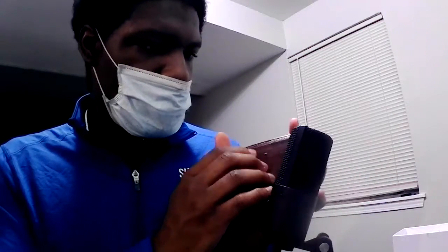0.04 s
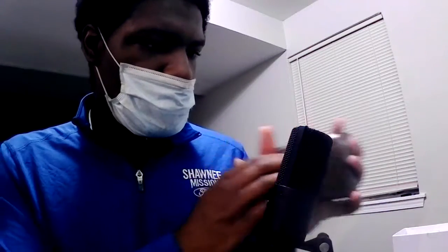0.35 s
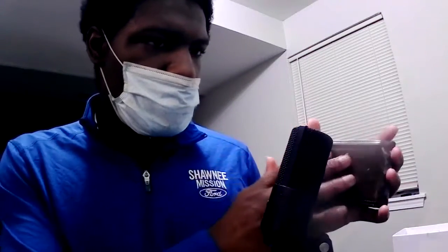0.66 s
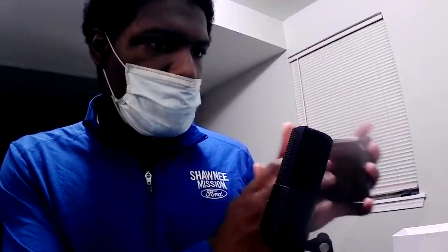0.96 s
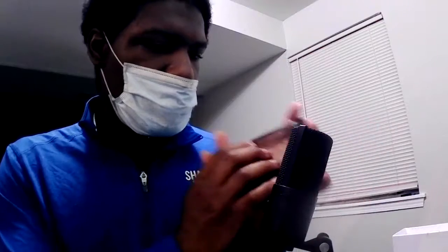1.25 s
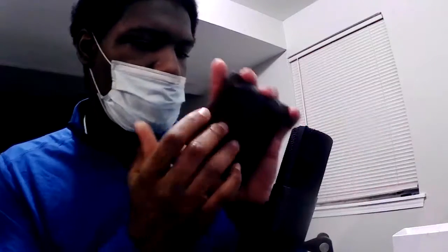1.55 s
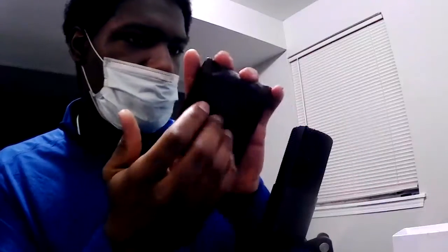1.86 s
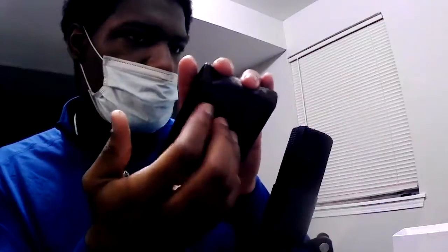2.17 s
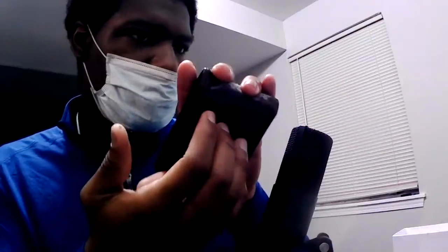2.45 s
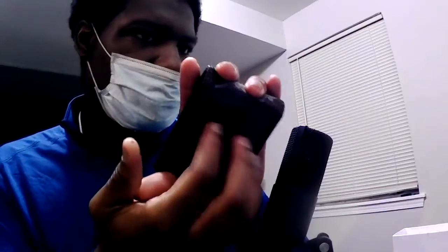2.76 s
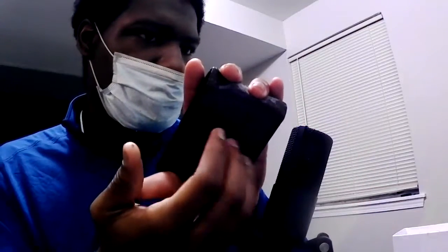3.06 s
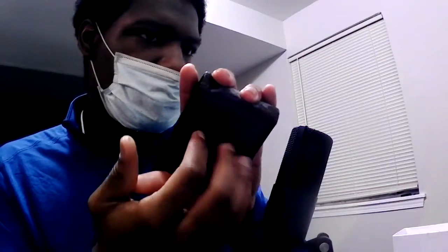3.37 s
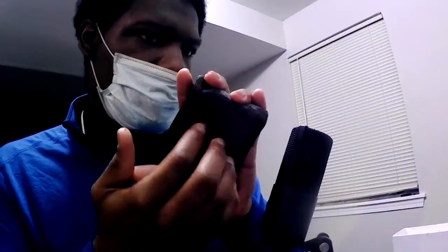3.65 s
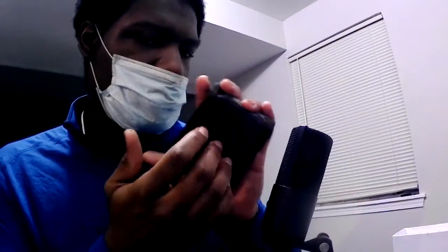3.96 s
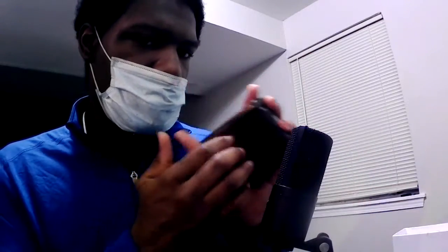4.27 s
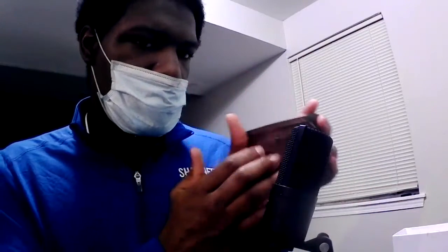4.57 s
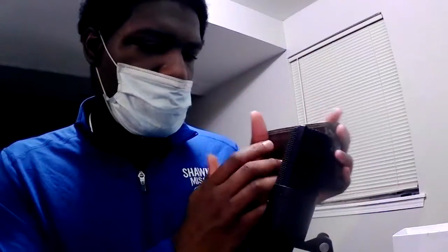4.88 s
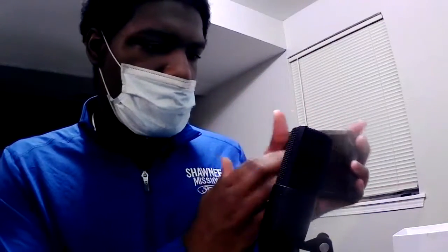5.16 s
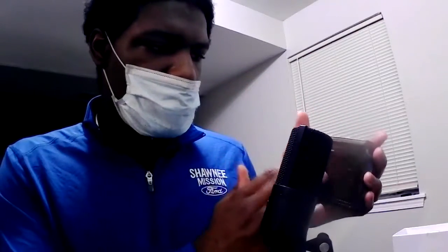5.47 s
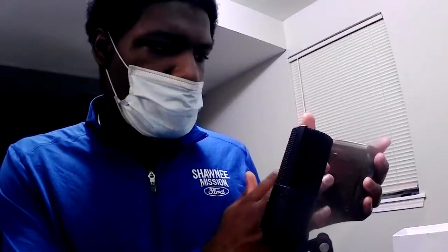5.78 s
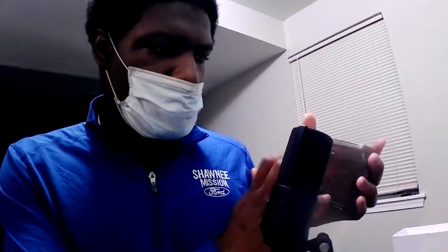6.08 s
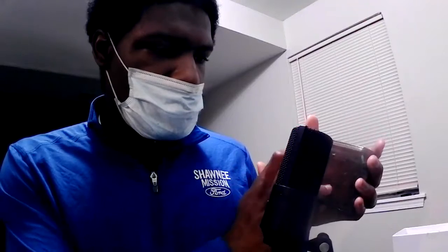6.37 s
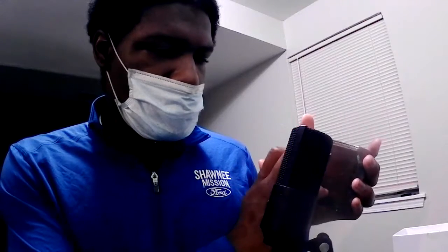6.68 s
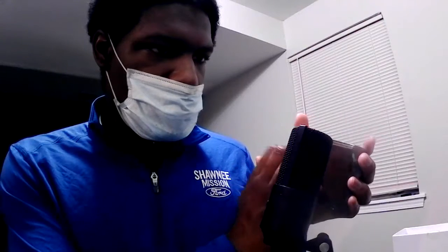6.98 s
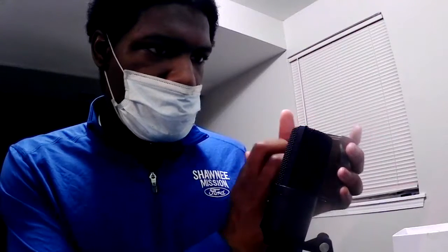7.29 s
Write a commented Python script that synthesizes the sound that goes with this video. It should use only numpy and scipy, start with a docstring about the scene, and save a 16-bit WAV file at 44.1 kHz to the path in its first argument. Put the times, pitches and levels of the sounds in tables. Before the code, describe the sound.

Fingertips drum on a small hard case right against a microphone, making quick nail ticks and deep, soft thumps in a quiet room.

```python
"""A quiet room, one microphone, a small hard case held right against it. Fingers drum on the case:
each nail ticks on the shell and each soft pad shoves it, a deep thump at this distance.
Firm taps and two-finger rolls open, then lighten after a second. From 2.6 s the rolls crowd together;
from 4 s firm taps mix in again, and after 6 s light taps close. The shifting hold colours them all.
Throughout, the small room answers faintly over a steady hush."""
import sys
import numpy as np
from scipy import signal
from scipy.fft import rfft, irfft, next_fast_len
from scipy.io import wavfile

SR = 44100
rng = np.random.default_rng(int(sys.argv[2]) if len(sys.argv) > 2 else 0)


def to_wav(s):
    """Save 16-bit WAV."""
    ch = np.atleast_2d(s).T  # columns
    pcm = np.round(np.clip(ch, -1, 1) * 32767)  # PCM
    wavfile.write(sys.argv[1], SR, pcm.astype(np.int16))


N = 323253

# Single fingertips on the case, right at the microphone; levels are relative.
# t/s, tick/dB, hollow knock/dB over tick, sharp edge/dB over tick, thump/dB
FINGER_TAPS = [(0.0836, -51, 1, -4.5, -25), (0.2704, -59.5, 7, 4.5, -25.5), (0.4089, -58.5, 5.5, 3, -25),
               (0.6055, -66, 6.5, -2, -34), (0.7014, -51, 2, -1, -23), (0.8614, -61, -3.5, -1, -31.5),
               (1.0653, -64, 2, 0.5, -42.5), (1.1925, -64, 6.5, 3.5, -34), (1.2902, -68, -4, -18, -44.5),
               (1.5459, -66, -1.5, -14, -41.5), (1.6415, -69, -3, 4, -51),
               (1.7561, -59.5, -7.5, -9.5, -38.5), (1.845, -54, 3.5, -2, -27.5),
               (1.9467, -53, -12, -10, -33), (2.0988, -66, 4, 0.5, -45.5), (2.1305, -62, -2, -7, -41),
               (2.1565, -64, 10.5, 1, -41.5), (2.2334, -67.5, -3, 0, -44), (2.319, -72, -2, 0.5, -51),
               (2.4028, -65, 17.5, 2, -42.5), (2.4765, -64, 11, 7.5, -37.5), (2.5649, -54.5, 1.5, -4, -37),
               (2.701, -69, 6.5, -2, -47.5), (2.8294, -68.5, 2, 4, -51), (2.9625, -65.5, -8, -7, -60),
               (2.9962, -68, 17, 8.5, -33), (3.0853, -62, -1.5, -9, -51.5), (3.144, -65, 15, -6, -36.5),
               (3.286, -84, 11, 1, -54.5), (3.3826, -54.5, -0.5, -10.5, -50),
               (4.1289, -60.5, -0.5, -12.5, -42.5), (4.1703, -61.5, 3.5, -11, -26.5),
               (4.2768, -60.5, 0.5, -8, -43.5), (4.451, -54, -2, -8, -38), (4.4945, -56, 2, -6, -29.5),
               (4.612, -58.5, -7, -15, -51), (4.8011, -52, 2, -5, -32.5), (5.1598, -56.5, 7.5, -3.5, -28.5),
               (5.232, -74, 6, 6, -49), (5.371, -50.5, 7, -3, -23), (5.5562, -53.5, 7.5, -3, -25),
               (5.7333, -49, -3, -11.5, -33), (5.9122, -52.5, -0.5, -15, -36), (6.059, -61, -2, -17, -44),
               (6.219, -59.5, -4, -15, -42.5), (6.2693, -66.5, -1, -2.5, -45),
               (6.4763, -70.5, 7.5, -15, -57.5), (6.8407, -66.5, 19, 2, -41.5), (6.952, -60, 9, -16, -50),
               (7.0253, -66, 14.5, 5, -46), (7.149, -64.5, 13.5, -4.5, -47), (7.2496, -69.5, 16, -4, -45)]
def taps(flex_db=-29, flex_follow=0.51):
    """Nail contacts and pad shoves of taps: both land together; the case swings, its face bends a bit."""
    contacts, shoves = [], []
    for s, tick_db, knock_db, edge_db, thump_db in FINGER_TAPS:
        _, _, swing_hz, flex_hz = held(s)
        contacts.append((s, tick_db, knock_db, edge_db))
        shoves += [(s, thump_db, swing_hz), (s, flex_db + flex_follow * thump_db, flex_hz)]
    return contacts, shoves


NAIL_LAG_S = 0.00288  # a flat finger's nail lands after its pad
# Two-finger rolls, just as close; levels are relative.
# t/s, tick/dB, knock/dB over tick, thump/dB, swing/Hz, face flex/dB over thump, graze lead/s, graze/dB
FINGER_ROLLS = [(0.1705, -54.5, 7.5, -23, 135, -4.5, 0.0044, -57),
                (0.332, -53.5, 8, -20, 129.6, -6.5, .003, -66),
                (0.4815, -52.5, 2, -20, 139, -31, 0.0028, -78),
                (0.573, -57.5, 5, -23.5, 120, -22, 0.0077, -64),
                (0.7737, -52.5, 6.5, -20, 126, -14, 0.011, -58.5),
                (0.9176, -55.5, 4, -24.5, 124, -23, 0.0051, -55.5),
                (1.3413, -61.5, -0.5, -36.5, 94, -4.5, 0.0088, -67),
                (2.0025, -56.5, 5.5, -26.5, 129, -11, 0.011, -52.5),
                (2.6098, -52, 11.5, -36.5, 117.4, -8, 0.013, -58),
                (2.7428, -53.5, 10.5, -35.5, 109, -12, 0.015, -55.5),
                (2.8736, -60, 11.5, -27.5, 178, -5.5, .0057, -57.5),
                (3.1585, -60.5, 14, -30, 123.4, -1.5, 0.0035, -53),
                (3.4688, -53.5, 10, -20, 125, 0, .0036, -51.5),
                (3.5618, -66, 9, -33, 114, -6.5, .0105, -53), (3.6176, -62, 13, -20, 129, -0.5, .0035, -50),
                (3.7406, -68, 6, -39.5, 129, -3.5, 0.011, -56.5),
                (3.7851, -56.5, 9.5, -18, 165, -12, 0.0056, -59.5),
                (3.9302, -60, 10.5, -28, 113, -5.5, 0.0066, -57.5),
                (3.9478, -91, 14.5, -28, 177, -5, 0.0039, -54),
                (4.192, -87, 12, -23.5, 150, -19, 0.004, -58.5), (4.35, -60.5, 7, -30, 109, -4, .0058, -56),
                (4.6642, -59.5, 10.5, -40, 137, -1, 0.0038, -59.5),
                (4.8746, -59.5, 6.5, -30.5, 103, -4, 0.006, -50),
                (4.9869, -61.5, 10.5, -32, 118, -6, 0.0093, -58.5),
                (5.032, -49.5, 7, -25.5, 111, -12, 0.014, -62.5),
                (5.4564, -50, 7.5, -21, 127, -24, 0.01, -58),
                (5.6397, -59.5, 3.5, -25.5, 113, -10, 0.0067, -50.5),
                (5.8044, -54.5, 4, -25.5, 83, -3.5, 0.0035, -56), (5.966, -57, 5, -32, 171, -3, 0.005, -68),
                (6.127, -65, 0, -38.5, 84.3, 1.5, 0.0039, -57.5)]
def rolls(flat_edge_db=-0.5, graze_knock_db=-3.5, graze_edge_db=-6, lag_per_lead=0.374):
    """Nail contacts and pad shoves of rolls: one nail grazes, then the next finger comes down flat."""
    contacts, shoves = [], []
    for s, tick_db, knock_db, thump_db, swing_hz, flex_db, lead_s, graze_db in FINGER_ROLLS:
        *_, flex_hz = held(s)
        contacts.append((s - lead_s, graze_db, knock_db + graze_knock_db, graze_edge_db))
        contacts.append((s, tick_db, knock_db, flat_edge_db))
        lands = s - NAIL_LAG_S - lag_per_lead * lead_s  # earlier still in a slow roll
        shoves += [(lands, thump_db, swing_hz), (lands, thump_db + flex_db, flex_hz)]
    return contacts, shoves


BOOM_SHARE = 0.62  # share of the face's boom that reaches pats and slaps
# The hold on the case, which booms when its broad face is turned to the microphone.
# t/s, boom/dB, shell pitch/ratio, swing under a fingertip/Hz, face flex/Hz
CASE_HOLD = [(1.0, 8.5, 1.06, 116, 201.8), (1.8, 6, 1.26, 110.3, 219), (2.38, 9, 0.92, 95, 217),
             (2.6, -2.5, 1.038, 122, 231), (3.5, 1, 0.99, 109, 274.6), (4.4, -1.5, 1.035, 114.7, 234),
             (5.2, 1, 0.98, 100, 246), (6.2, -3.5, 1.15, 79, 222), (6.8, -6, 0.87, 126, 181)]
def held(s):
    """Boom, shell pitch, swing and flex for the way the case is held at time s."""
    times, *columns = np.transpose(CASE_HOLD)
    return [np.interp(s, times, column) for column in columns]


def pad(hz, flex_hz, softness=3.06, slowing=0.17, ring_db=-22, ring_t60=0.11, grip=0.13):
    """One thump: the case swings up softly under the flesh, slows and is damped by the holding hand."""
    t = np.arange(SR // 8) / SR
    cycles = hz * t
    swell = (cycles * np.exp(1 - cycles)) ** softness
    swing = -swell * np.sin(2 * np.pi * np.log1p(slowing * cycles) / slowing)
    # the broad face rings on faintly, at a pitch set by the grip
    ring_hz = flex_hz * np.exp(grip * rng.standard_normal())
    ring = np.sin(2 * np.pi * ring_hz * t) * fade(t, ring_t60)
    return swing + amp(ring_db) * ring


def pads(shoves, gain_db=3.5, flesh_ratio=1.415, order=8, size=8192):
    """All the thumps of the finger pads; soft flesh passes little above the flex of the face."""
    track, hz = np.zeros(N), np.fft.rfftfreq(size, 1 / SR)
    lead = size // 8
    for s, db, shove_hz in shoves:
        *_, flex_hz = held(s)
        flesh = 1 / np.hypot(1, (hz / (flesh_ratio * flex_hz)) ** order)
        swing = np.pad(pad(shove_hz, flex_hz), (lead, 0))
        thump = irfft(rfft(swing, size) * flesh)
        add(track, s - lead / SR, amp(db + gain_db) * thump)
    return track


# Resonances of the hard shell: f/Hz, level/dB over the bare tick, t60/s
SHELL_MODES = [(423, 2, 0.15), (757, 5.5, 0.064), (1067, 2.5, 0.026), (1420, -3.5, 0.033),
               (2190, -16, 0.034), (3040, -5, 0.0038), (5610, -3.5, 0.0037)]
def shell(t, pitch, spot_db, grip=0.047):
    """The shell rings; grip and striking spot change each mode's pitch and strength from tap to tap."""
    ring = np.zeros(len(t))
    for mode_hz, db, t60 in SHELL_MODES:
        detune, spot = rng.standard_normal(2)
        hz = mode_hz * pitch * (1 + grip * detune)
        decay = fade(t, t60)
        ring += amp(db + spot_db * spot) * 2 * decay / decay.sum() * np.cos(2 * np.pi * hz * t)
    return ring


# Colour of a nail's tick, heard close up: f/Hz, spectral level/dB
TICK_COLOUR = [(120, -3), (420, 5), (750, -3.5), (1000, 2), (1400, 7), (1950, 3), (3200, 2.5), (5500, 0.5),
               (7200, -4.5), (8500, 0), (11000, -3.5), (13000, -9), (15500, -30)]
def nail(s, knock_db, edge_db, spot_db=3, bounce=0.43, bounce_s=0.001022, scuff_s=0.0058, size=4096):
    """One tick, centred in its buffer, of unit energy at 2-6 kHz: scuff, snap and the ringing shell."""
    t, hz = np.arange(size) / SR, np.fft.rfftfreq(size, 1 / SR)
    boom_db, pitch, _, _ = held(s)
    shiver = rng.standard_normal(size) * fade(t, t60=0.011)
    blow = amp(-9) * shiver / np.linalg.norm(shiver)
    blow[0] += 1  # the bare snap
    blow = np.roll(blow + shell(t, pitch, spot_db), size // 2)
    # the skin lands just before the nail and scuffs as it flattens
    scuff = rng.standard_normal(size) * np.exp(-((t - t.mean()) / scuff_s) ** 2)
    blow += amp(-17 + spot_db * rng.standard_normal()) * scuff / np.linalg.norm(scuff)
    # reflections off the hand and the microphone's body notch each tick differently
    hand_s, mic_s = bounce_s * rng.uniform(0.23, 1, 2)
    notches = 1 + bounce * (np.exp(-2j * np.pi * hz * hand_s) - np.exp(-2j * np.pi * hz * mic_s))
    touch = [(1300, knock_db), (3100, 0.048), (3900, 0), (6200, edge_db)]
    face = [(800, boom_db), (1050, 0.03)]
    colour_db = along(TICK_COLOUR, hz) + along(touch, hz) + along(face, hz)
    spectrum = rfft(blow) * notches * causal(amp(colour_db))
    middle = (hz > 2000) & (hz < 6000)
    return irfft(spectrum) / np.linalg.norm(irfft(spectrum * middle))


def nails(contacts, gain_db=26.5):
    """Nails strike the shell: one tick for a tap, two for a roll."""
    track = np.zeros(N)
    for s, db, knock_db, edge_db in contacts:
        tick = nail(s, knock_db, edge_db)
        add(track, s - len(tick) / 2 / SR, amp(db + gain_db) * tick)
    return track


def slaps(gain_db=-20, t60=0.0097, slap_hz=600, q=1.3):
    """A flat finger slaps the broad face as it settles: a short, dull knock that grows with the blow."""
    t, track = np.arange(SR // 16) / SR, np.zeros(N)
    for s, _, _, thump_db, *_ in FINGER_ROLLS:
        strength = amp(gain_db + thump_db + BOOM_SHARE * held(s)[0])
        add(track, s - NAIL_LAG_S, strength * rng.standard_normal(len(t)) * fade(t, t60))
    return filtered(track, lambda hz: (1j * hz / (1j * hz + q * (slap_hz - hz ** 2 / slap_hz))) ** 2)


def pats(shoves, gain_db=-43.0, follow=0.52, t60=0.18, pat_hz=600):
    """Flesh pats the shell: a dull puff with every thump that grows only slowly with the blow."""
    t, track = np.arange(SR // 8) / SR, np.zeros(N)
    for s, db, _ in shoves:
        strength = amp(gain_db + follow * db + BOOM_SHARE * held(s)[0])
        add(track, s, strength * rng.standard_normal(len(t)) * fade(t, t60))
    return filtered(track, lambda hz: 4 * (1j * hz / pat_hz) / (1 + 1j * hz / pat_hz) ** 3)


def rub(corner_hz):
    """Skin rubs the shell: unit-level noise in the tick's colour, thinned below the corner."""
    return noise(lambda hz: amp(along(TICK_COLOUR, hz)) * hz / np.hypot(hz, corner_hz))


# Slides between taps, faint even this close: middle t/s, length/s, level/dB
SKIN_SLIDES = [(1.061, 0.085, -76), (2.416, 0.027, -67.5), (2.758, 0.084, -70), (5.07, .05, -76.5),
               (6.633, 0.033, -76.5)]
def slides():
    """Skin slides over the shell: a soft, high hiss that swells and fades."""
    t = np.arange(N) / SR
    swells = sum(amp(db) * np.exp(-(2 * (t - s) / length) ** 2) for s, length, db in SKIN_SLIDES)
    return rub(corner_hz=7000) * swells


def handling(contacts, rumble_db=-67, rumble_hz=55, rustle_db=-84, follow=0.18, linger_s=0.12):
    """The case shifts in the holding hand around every blow: a faint rumble and a rustle of skin."""
    t = np.arange(N) / SR
    effort = sum(amp(follow * db) * np.exp(-((t - s) / linger_s) ** 2) for s, db, _, _ in contacts)
    rumble = amp(rumble_db) * noise(lambda hz: (hz / rumble_hz) / (1 + (hz / rumble_hz) ** 4))
    rustle = amp(rustle_db) * rub(corner_hz=5000)
    return np.sqrt(effort / effort.mean()) * (rumble + rustle)


# Decay of the small room around the microphone: f/Hz, t60/s
ROOM_DECAY = [(100, 0.064), (400, 0.21), (2000, 0.08), (10000, 0.046)]
def room(x, build_s=0.0022, stretches=24):
    """The room's answer, whose paths keep changing as the hands move."""
    wet, t = np.zeros(N), np.arange(SR // 3) / SR
    for part in np.array_split(np.arange(N), stretches):
        hz, age, spectra = signal.stft(rng.standard_normal(len(t)), SR, nperseg=256)
        _, tail = signal.istft(spectra * fade(age, along(ROOM_DECAY, hz)[:, None]), SR)
        tail = tail[:len(t)] * (1 - np.exp(-t / build_s))
        add(wet, part[0] / SR, signal.fftconvolve(x[part], tail / np.linalg.norm(tail)))
    return wet


# Room tone at the microphone: f/Hz, relative spectral level/dB
ROOM_TONE = [(35, -23.5), (100, -4.5), (180, -1), (310, 0), (460, -8.5), (545, -3.5), (620, -12.5),
             (820, -16.5), (1020, -8.5), (1250, -18.5), (2100, -18), (3500, -26.5), (6500, -39),
             (8800, -30.5), (11000, -30), (13500, -38), (15500, -47)]
def hush(level_db=-71.0):
    """Steady air noise of the room with the microphone's own hiss."""
    return amp(level_db) * noise(lambda hz: amp(along(ROOM_TONE, hz)))


def amp(db):
    """Decibels to gain."""
    return 10 ** (np.asarray(db) / 20)


def along(points, hz):
    """(Hz, value) points read on a log axis."""
    f, v = np.transpose(points)
    return np.interp(np.log(hz + 1), np.log(f), v)


def filtered(x, response):
    """x through a response given as a function of frequency."""
    size = next_fast_len(N + SR // 2)
    return irfft(rfft(x, size) * response(np.fft.rfftfreq(size, 1 / SR)), size)[:N]


def noise(response):
    """Unit-level noise coloured by a response."""
    coloured = filtered(rng.standard_normal(N), response)
    return coloured / coloured.std()


def causal(gain):
    """The response with this gain that never sounds before its cause."""
    cepstrum = irfft(np.log(gain + 1e-9))
    half = len(cepstrum) // 2
    cepstrum[1:half] *= 2
    cepstrum[half + 1:] = 0
    return np.exp(rfft(cepstrum))


def fade(t, t60):
    """A decay of 60 dB in t60 seconds."""
    return np.exp(-np.log(1000) * t / t60)


def add(track, s, sound):
    """Mix a sound into the track at time s."""
    part = track[max(0, round(s * SR)):][:len(sound)]
    part += sound[:len(part)]


def scene(tick_room_db=-5, thump_room_db=-22, radiate_hz=3200):
    """The thumps live in the near field; the small case sends mostly its treble out into the room."""
    tap_contacts, tap_shoves = taps()
    roll_contacts, roll_shoves = rolls()
    contacts, shoves = tap_contacts + roll_contacts, tap_shoves + roll_shoves
    ticks = nails(contacts) + pats(shoves) + slaps() + slides()
    thumps = pads(shoves) + handling(contacts)
    radiated = filtered(ticks, lambda hz: 1j * hz / (radiate_hz + 1j * hz))
    answer = room(amp(tick_room_db) * radiated + amp(thump_room_db) * thumps)
    return (ticks + thumps + answer + hush())[None]


def record(dry):
    """One microphone, into a recorder that keeps nothing above 15.7 kHz."""
    return filtered(dry[0], lambda hz: hz < 15700)[None]


dry = scene()
out = record(dry)
to_wav(out)
```